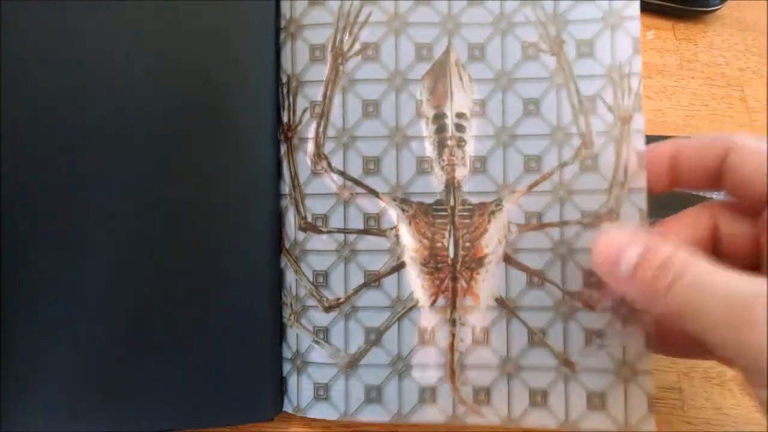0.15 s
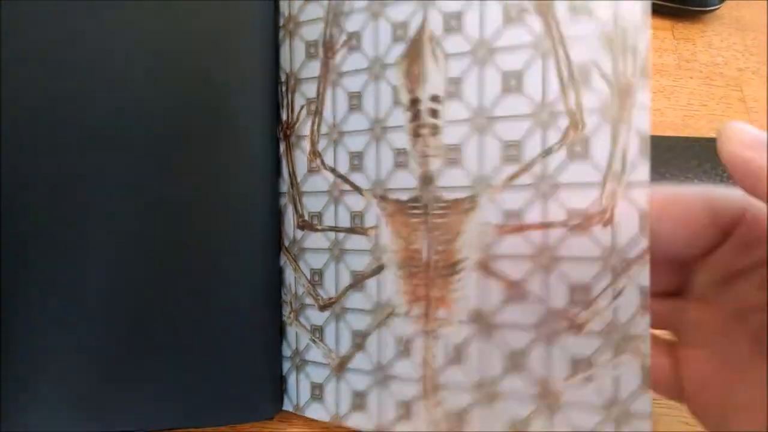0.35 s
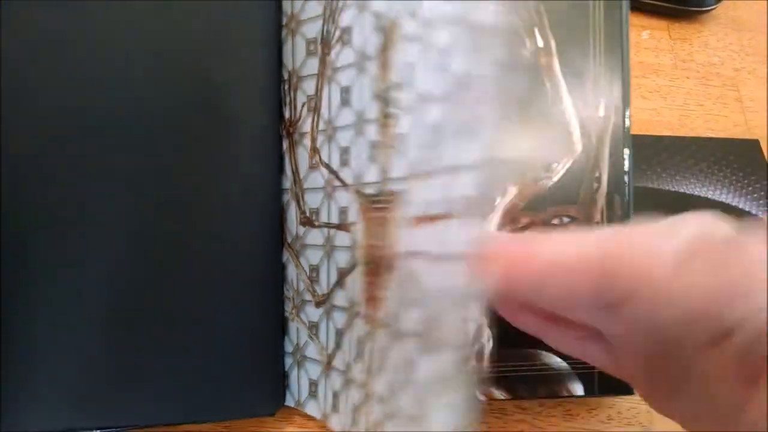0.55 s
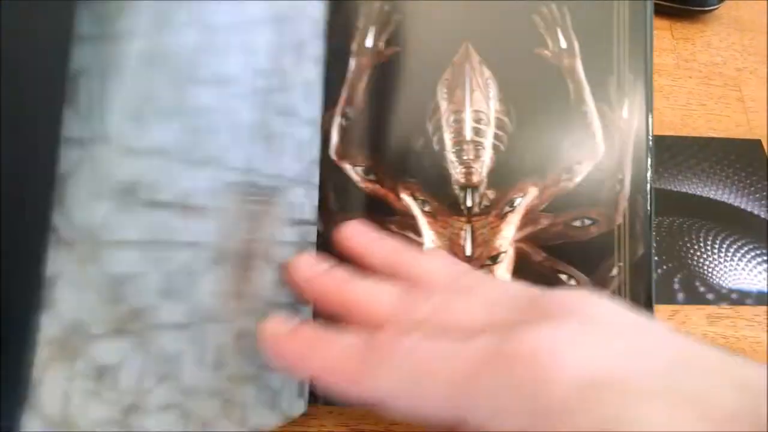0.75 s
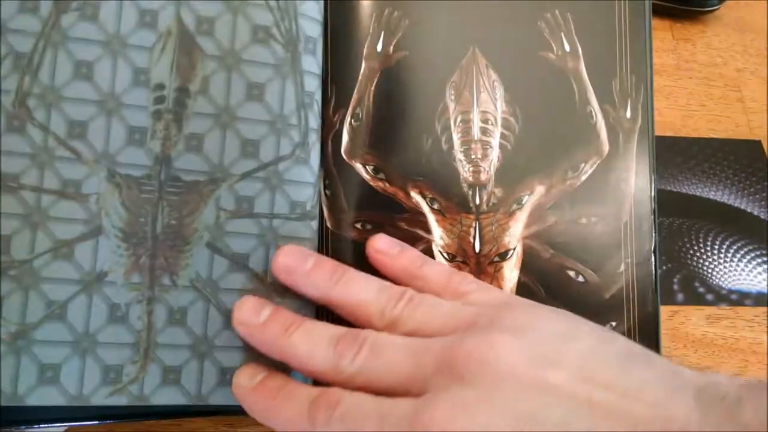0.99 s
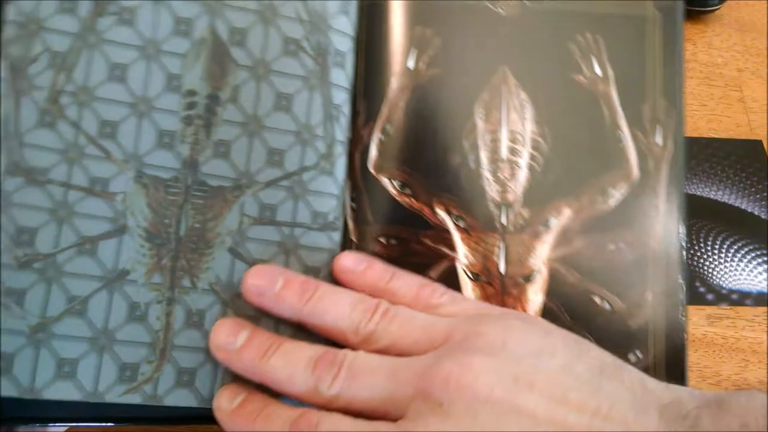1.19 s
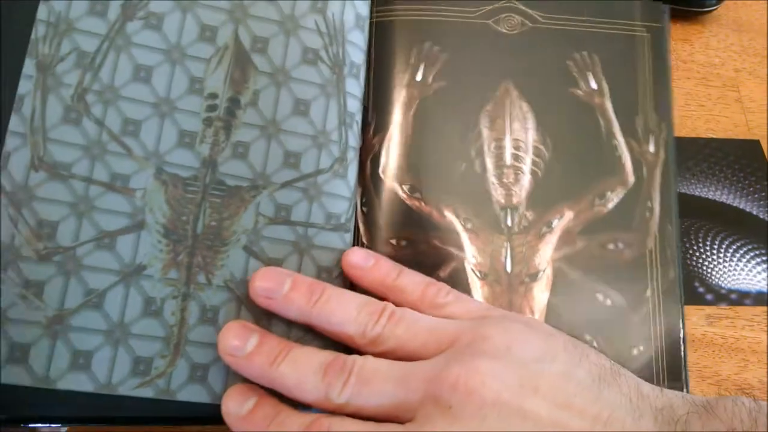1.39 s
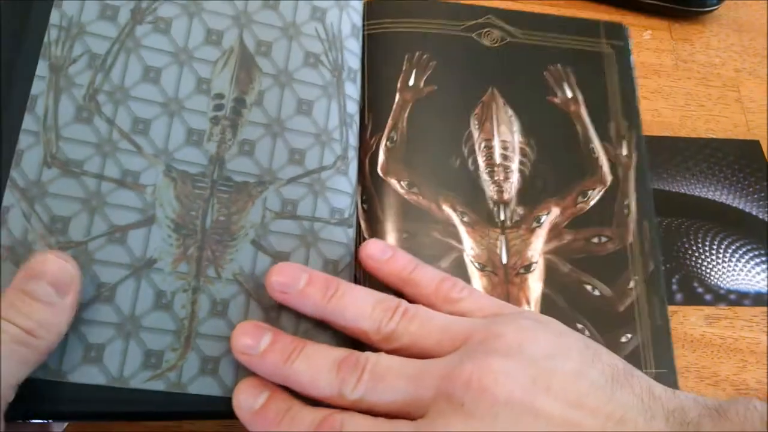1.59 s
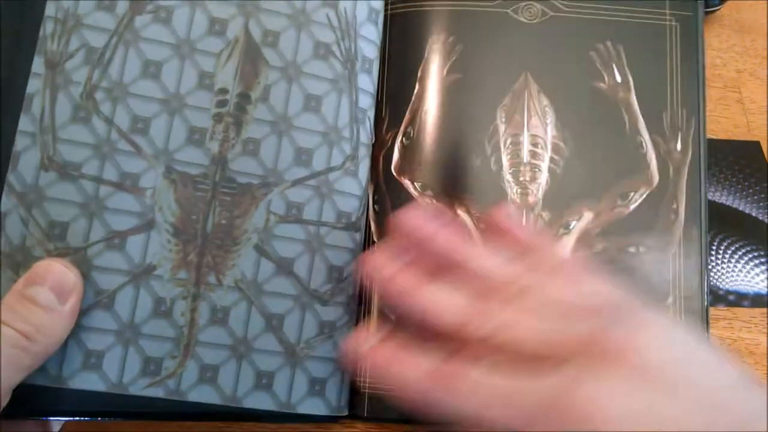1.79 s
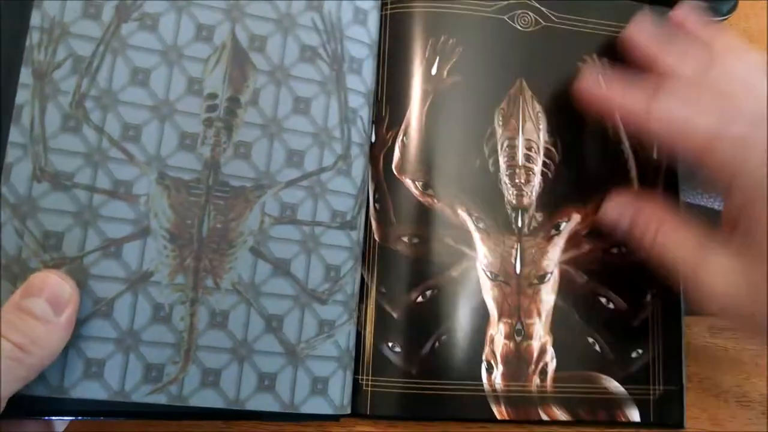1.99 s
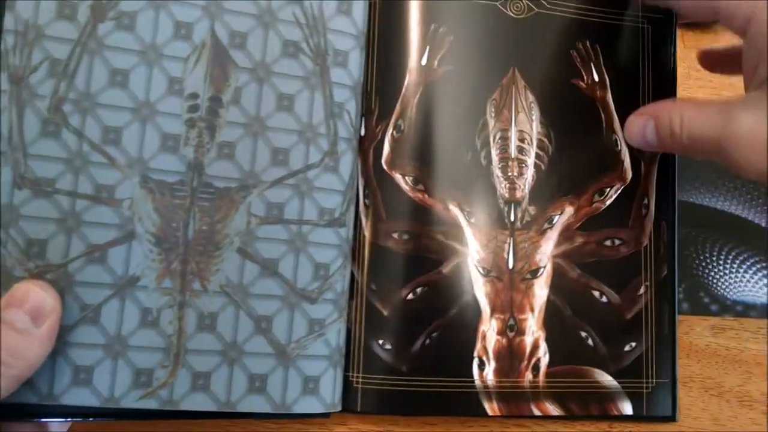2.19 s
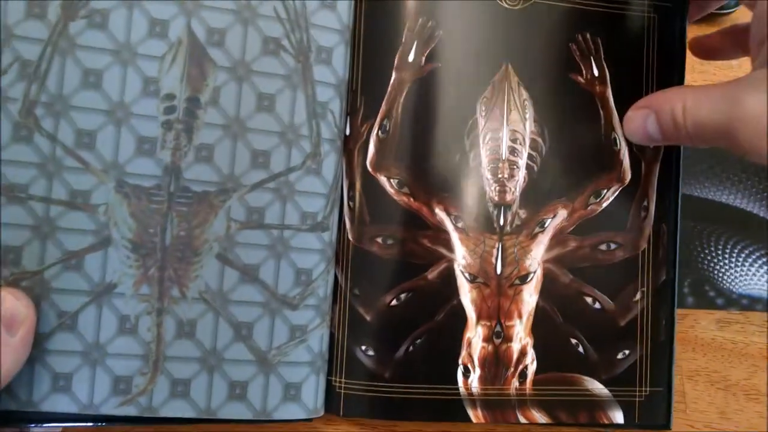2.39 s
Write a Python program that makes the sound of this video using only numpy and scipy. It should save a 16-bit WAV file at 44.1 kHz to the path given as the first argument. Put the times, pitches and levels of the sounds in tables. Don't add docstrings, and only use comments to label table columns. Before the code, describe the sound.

A clear plastic sheet in a stiff booklet is lifted and turned with dense crackles and pops, then snaps flat; cover taps on a wooden table and hand strokes follow, close stereo microphone, quiet room.

```python
import sys
import numpy as np
from scipy import signal
from scipy.fft import rfft, irfft
from scipy.io import wavfile

SR = 44100
rng = np.random.default_rng(int(sys.argv[2]) if len(sys.argv) > 2 else 0)


def level_to_linear(level):
    exponent = np.asarray(level, float) / 20
    return 10 ** exponent


def bounce(signal):
    frames = np.transpose(np.atleast_2d(signal))
    limited = np.clip(frames, -1, 1)
    pcm = np.round(limited * 32767).astype(np.int16)
    wavfile.write(sys.argv[1], SR, pcm)


N = 108045


def rms_one(x):
    return x / np.sqrt(np.mean(x ** 2) + 1e-20)


def in_time(tables):
    rows = np.concatenate(tables)
    start_s, *columns = rows[np.argsort(rows[:, 0], kind="stable")].T
    return [np.interp(np.arange(N) / SR, start_s, column) for column in columns]


def at_hz(points, hz):
    point_hz, level_db = np.array(points).T
    return np.interp(np.log(hz), np.log(point_hz), level_db)


def drift(rate_hz):
    r = np.exp(-40 * np.pi * rate_hz / SR)
    slow = signal.lfilter([1], [1, -2 * r, r * r], rng.standard_normal(N // 20 + 2002))[2000:]
    return np.interp(np.arange(N) / 20, np.arange(len(slow)), rms_one(slow))


def ring(clicks, hz, t60_s):
    r = level_to_linear(-60 / (t60_s * SR))
    w = 2 * np.pi * hz / SR
    return signal.lfilter([0, np.sin(w)], [1, -2 * r * np.cos(w), r * r], clicks + 1e-18)


def late(x, delay_s):
    hz = np.arange(N // 2 + 1) * SR / N
    return irfft(rfft(x) * np.exp(-2j * np.pi * hz * delay_s), N)


def click(start_s, level_db):
    return (np.arange(N) == int(start_s * SR)) * level_to_linear(level_db)


def cracks(events, fall_s):
    t, noise = np.arange(N) / SR, rng.standard_normal(N)
    return sum(level_to_linear(db) * noise * (t >= s) * np.exp(-np.abs(t - s) / fall_s) for s, db in events)


def high_pass(x, hz):
    return signal.sosfilt(signal.butter(2, hz, "high", fs=SR, output="sos"), x)


def banded(spectrum, patchy_db, dull_db, edges_hz):
    pivot_hz, flicker_hz = 6550, 26.0
    out, plain, together = 0, 0, drift(flicker_hz)
    white = rng.standard_normal((2, 2, N))
    for k, (low, high) in enumerate(zip(edges_hz, edges_hz[1:])):
        band = signal.sosfilt(signal.butter(2, [low, high], "band", fs=SR, output="sos"), white[k % 2])
        hz = np.sqrt(low * high)
        flicker_db = patchy_db * (1.08 * together + drift(flicker_hz))
        band = band * level_to_linear(at_hz(spectrum, hz) + flicker_db)
        plain = plain + band
        out = out + band * level_to_linear(dull_db * np.log2(pivot_hz / hz))
    return out / np.sqrt(np.mean(plain ** 2))


# pitch_hz, level_db (per Hz)
ROOM_TONE = [(20, 17), (250, 1), (500, -9.5), (1000, -26), (1700, -17.5), (3800, -20), (5500, -26),
             (15400, -60)]


def room_tone():
    return level_to_linear(-44.5) * banded(ROOM_TONE, 1.26, 0, 18 * 2 ** np.arange(0, 10.1, .5))


# start_s, level_db, dull_db
STROKES = [
    [(0, -42.5, -1), (.04, -49, 1.5), (.055, -66, 22), (.19, -59.5, -8), (.25, -35, 3), (.33, -36.5, -1.5),
     (.46, -37, 5.5), (.6, -39.5, 2.5), (.74, -37.5, 2)],
    [(.78, -36, 2), (.87, -32.5, 0), (.95, -36, -2.5), (1.06, -43, -2), (1.15, -48.5, 1.5),
     (1.25, -37.5, -8), (1.36, -43, 0), (1.385, -62, 3)],
    [(1.4, -43.5, -3.5), (1.458, -39, -2), (1.56, -47, 0.5), (1.61, -59, -15), (1.67, -78, -6),
     (1.68, -45, 12), (1.735, -72, 14)],
    [(1.756, -43.5, -13), (1.84, -40.5, 0.5), (1.862, -27.5, -2), (2.05, -29, -1.5), (2.1, -33, 2.5),
     (2.24, -42, 3.5), (2.29, -40.5, 3.5), (2.33, -59, 6), (2.45, -89, -11)],
]
# start_s, length_s, level_db
NAIL_CATCHES = [
    (0.322, 0.014, -32.5),
    (2.267, 0.019, -48),
]
# pitch_hz, level_db
SKIN_HISS = [(500, -18.5), (1000, -37), (2000, 3), (3800, -1), (6500, -0.5), (9500, -5), (14000, -2),
             (16000, 2)]


def sliding():
    gain_db, patchy_db, grain_db, grain_hz = 2.5, 1.0, 1.8, 315.0
    level_db, dull_db = in_time(STROKES)
    t = np.arange(N) / SR
    third_octaves_hz = 500 * 2 ** np.arange(0, 5.3, 1 / 3)
    hiss = banded(SKIN_HISS, patchy_db, np.clip(dull_db, -4, 8), third_octaves_hz)
    catches = 0
    for start_s, length_s, catch_db in NAIL_CATCHES:
        half_s = length_s / 2
        catches = catches + level_to_linear(catch_db) * np.exp(-((t - start_s - half_s) / half_s) ** 4)
    return hiss * (level_to_linear(level_db + gain_db + grain_db * drift(grain_hz)) + catches)


# start_s, level_db, depth_db (per octave)
BENDS = [
    [(0, -56, 13.5), (.16, -58, -20.5), (.22, -50.5, -22), (.3, -45, -18), (.35, -34, -4.5),
     (.425, -24.5, -4.5), (.474, -30.5, 1), (.481, -20.5, -4.5), (.54, -25, -2), (.55, -32, 3)],
    [(.58, -28.5, 1.5), (.64, -38, 5.5), (.79, -52.5, 11.5), (.84, -34, 4.5), (.91, -34.5, 8),
     (.96, -42, 1), (.982, -28.5, 3), (1.02, -32.5, -2.5), (1.05, -47, 6)],
    [(1.085, -34.5, 4.5), (1.13, -49.5, 4), (1.4, -52, 2.5), (1.445, -51, 10), (1.66, -53, 2),
     (2.2, -49, 7.5), (2.33, -53.5, 7), (2.4, -49, 5), (2.45, -51, 3.5)],
]


def bending():
    return in_time(BENDS)


def page_air(bend_db):
    air = signal.sosfilt(signal.butter(2, [70, 285], "band", fs=SR, output="sos"), rng.standard_normal((2, N)))
    follow_db = 0.79 * (bend_db - bend_db.mean())
    return rms_one(air) * level_to_linear(-52 + follow_db + 2.5 * drift(25.0))


# pitch_hz, level_db
SHEET_COLOUR = [(300, -15.5), (550, -17.5), (800, -9.5), (1100, -10), (1600, -2.5), (2000, -3.5),
                (2500, -0.5), (3800, -24.5)]


def creasing(bend_db, depth_db):
    creases_per_s, ring_cycles, spread_db = 7000, 23.7, 3.5
    gain_db, clump_db, clump_hz = 0.08, 1.5, 190.0
    out, plain = np.zeros((2, N)), np.zeros((2, N))
    pitches_hz = np.geomspace(300, 4200, 28)
    for side, flat in zip(out, plain):
        sizes = level_to_linear(spread_db * np.minimum(rng.exponential(1, N), 5)) * rng.choice([-1, 1], N)
        born = rng.random(N) < creases_per_s / SR
        dealt = rng.integers(0, 28, N)
        for k, hz in enumerate(pitches_hz):
            mode = ring(sizes * born * (dealt == k), hz, ring_cycles / hz)
            mode = level_to_linear(at_hz(SHEET_COLOUR, hz)) * np.sqrt(hz) * mode
            flat += mode
            side += mode * level_to_linear(depth_db * np.log2(1400 / hz))
    level = level_to_linear(bend_db + gain_db + clump_db * drift(clump_hz))
    return out / np.sqrt(np.mean(plain ** 2)) * level


# start_s, level_db
TICKS = [(.0716, -50), (.176, -46), (0.2296, -29), (.2601, -33), (0.2935, -46), (.3752, -20), (.4625, -35),
         (0.4783, -28), (0.526, -30), (0.637, -32), (.7185, -47), (1.11, -37), (1.1238, -30.5),
         (1.5925, -38), (1.6155, -46), (1.7568, -25), (2.3915, -50)]


def paper_ticks():
    return cracks(TICKS, .0012)


# start_s, level_db (peak), pitch_hz, bright_db
BUCKLES = [(0.1738, -39, 1580, -16), (0.2925, -21.5, 1680, -15), (0.3088, -27.5, 1520, -13),
           (0.3487, -25, 1610, -14), (0.3606, -18.5, 1460, -27), (0.3753, -15.5, 1440, 0.5),
           (0.4112, -15, 1520, -3.5), (0.4149, -20, 1340, -5), (0.4197, -12, 1390, -13),
           (0.4234, -13, 1550, -21), (0.4245, -13, 1620, -9), (0.4297, -15, 1400, -11),
           (0.4376, -23, 1530, 1), (0.4413, -16, 1950, -24), (0.4461, -28, 1370, -21),
           (0.4492, -24, 1420, -11), (0.4797, -21, 1420, -18), (0.4822, -20, 1630, -27),
           (0.4895, -25, 1700, 2), (0.4973, -12, 1340, -27), (0.5025, -13.5, 1480, -13),
           (0.512, -19, 1630, -27), (0.5162, -12, 1390, -16), (0.5289, -18, 1540, -4),
           (0.5317, -14, 1470, -29), (0.5367, -17.5, 1420, -34), (0.5423, -20, 1380, -28),
           (0.5693, -20.5, 1130, -24), (0.5745, -21, 1180, -11), (0.5802, -26, 1220, -18),
           (0.584, -24, 1390, -22), (0.587, -31, 1360, -21), (0.6797, -23.5, 1824, -20),
           (0.6809, -28, 1820, -34), (0.83, -73, 1500, -13), (0.836, -22, 930, 1), (0.8442, -29, 1000, -1),
           (0.8912, -29, 1410, -17), (0.8999, -27, 1220, -5), (0.9772, -24, 1240, -17),
           (0.9796, -26, 1450, -24), (0.984, -18, 1520, -23), (0.9931, -25, 1250, -15),
           (1.0059, -17, 1600, -25), (1.0169, -25, 1340, -19), (1.0827, -30, 1270, -21)]


def buckles():
    rise_s, low_db, crack_gain_db = .0011, -7.5, 1.5
    out = np.zeros(N)
    age = np.arange(600) / SR
    swell = age / rise_s * np.exp(1 - age / rise_s)
    for start_s, level_db, pitch_hz, _ in BUCKLES:
        turn = 2 * np.pi * pitch_hz * age
        push = np.sin(turn) + level_to_linear(low_db) * np.sin(0.693 * turn)
        out[int(start_s * SR):][:600] += level_to_linear(level_db) * swell * push
    return out + cracks([(s, db + bright_db + crack_gain_db) for s, db, _, bright_db in BUCKLES], .0012)


def room(x):
    t = np.arange(int(.3 * SR)) / SR
    t60_s, first_echo_s = 1, .004
    tails = rng.standard_normal((2, len(t))) * level_to_linear(-60 * t / t60_s) * (t > first_echo_s)
    tails = tails / np.sqrt(np.sum(tails ** 2) / 2)
    return level_to_linear(-20) * signal.fftconvolve(x[None], tails, axes=1)[:, :N]


# pitch_hz, level_db, t60_s, left_db (extra at the left port)
SNAP_MODES = [(1390, -22, 0.0081, 12), (2050, -3.5, 0.0018, 9.5), (2990, 2, 0.0024, 6),
              (3700, -17.5, 0.011, 5), (5100, -2.5, 0.001, -10), (7600, -6.5, 0.0018, 5),
              (9600, -4, 0.0014, -6), (12600, -5.5, 0.0023, -7), (14300, -9, 0.001, -4)]


def snap():
    start_s, snap_db = 1.09367, 3.5
    out = 0
    for k, (pitch_hz, level_db, t60_s, left_db) in enumerate(SNAP_MODES):
        mode = ring(click(start_s, snap_db + level_db), pitch_hz, t60_s)
        out = out + (-1) ** k * mode * level_to_linear(np.array([[left_db], [0]]))
    return out


# start_s, level_db, hard_db, weight_db
TAPS = [(1.5, -47.5, 2, 20), (1.5013, -28, -15, -4), (1.503, -22.5, -14, 8.5), (1.518, -42, -1, -3),
        (1.546, -38.5, -4, 15), (1.6755, -34.5, 5.5, -19), (1.6768, -45, 4, -7), (1.6783, -24, 2, -25),
        (1.6806, -40, 6, -3), (1.687, -34, -17, -2), (1.695, -37, -17, 0), (1.708, -40.5, 5, 3),
        (1.773, -50, 1, 24)]
# pitch_hz, level_db, t60_s
COVER_MODES = [(179, 2.5, 0.022), (370, -5, 0.06), (540, -17, 0.0086), (710, -3, 0.021), (844, 3, 0.026),
               (1390, 4, 0.013), (1970, 10.5, 0.0053), (3200, -2, 0.0048), (4200, 3, 0.01),
               (5870, -20, 0.0025)]


def taps():
    crack_gain_db = 2.5
    out = cracks([(s, db + hard_db + crack_gain_db) for s, db, hard_db, _ in TAPS], 0.0013)
    for start_s, level_db, hard_db, weight_db in TAPS:
        for pitch_hz, mode_db, t60_s in COVER_MODES:
            if pitch_hz < 250:
                colour_db = weight_db
            elif pitch_hz < 450 or pitch_hz > 1000:
                colour_db = hard_db
            else:
                colour_db = 0
            out = out + ring(click(start_s, level_db + mode_db + colour_db), pitch_hz, t60_s)
    return out


def table_hum():
    start_s, pitch_hz, rise_s, fall_s = 1.685, 111, 0.0072, 0.057
    t = np.maximum(np.arange(N) / SR - start_s, 0)
    level = level_to_linear(-18.5 + 3.0 * drift(45.0))
    return level * (1 - np.exp(-t / rise_s)) * np.exp(-t / fall_s) * np.sin(2 * np.pi * pitch_hz * t)


def scene():
    bend_db, depth_db = bending()
    background = room_tone() + page_air(bend_db)
    rubbing = sliding() + high_pass(creasing(bend_db, depth_db), 307)
    sheet_hits = high_pass(paper_ticks() + buckles() + snap(), 490)
    near = sheet_hits + high_pass(taps() + table_hum(), 73)
    hits = np.array([level_to_linear(1) * near[0], late(near[1], .00009)])
    return hits * level_to_linear(-5.5) + room(near[1]) + rubbing + background


# pitch_hz, level_db
SIDE_TRIM = [(30, -14), (100, -10.5), (350, -8), (750, -3), (1400, -1), (2300, -7), (8000, 2), (16000, -1)]


def narrow_bass(difference):
    trim = level_to_linear(at_hz(SIDE_TRIM, np.arange(1, N // 2 + 2) * SR / N))
    return irfft(rfft(difference) * trim, N)


def top_cut(x):
    return signal.sosfilt(signal.butter(12, 16480, fs=SR, output="sos"), x)


def record(dry):
    own_db, cross_db, port_lag_s = -3, -1.7, 0.0003927
    other = np.array([late(port, port_lag_s) for port in dry[::-1]])
    left, right = level_to_linear(own_db) * (dry - level_to_linear(cross_db) * other)
    hiss = level_to_linear(-56.5) * signal.lfilter([1, -0.21], [1], rng.standard_normal((2, N)))
    mid_cut = signal.cheby2(8, 45, 16500, fs=SR, output="sos")
    side_cut = signal.cheby2(18, 60, 15950, fs=SR, output="sos")
    mid = signal.sosfilt(mid_cut, (left + right) / 2 + hiss[0])
    side = signal.sosfilt(side_cut, narrow_bass(left - right) / 2 + hiss[1])
    return top_cut(np.clip([mid + side, mid - side], -.99, .99))


dry = scene()
out = record(dry)
bounce(out)
```